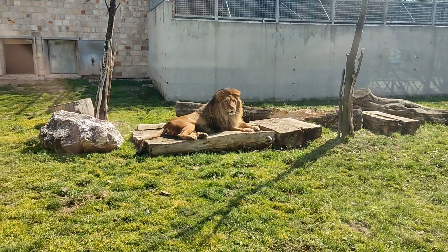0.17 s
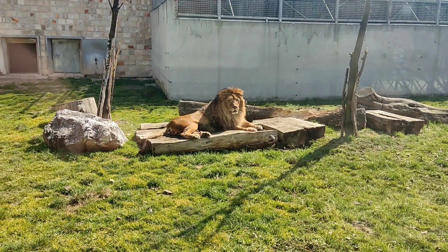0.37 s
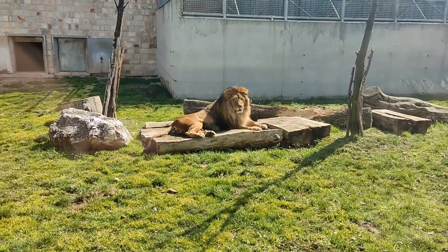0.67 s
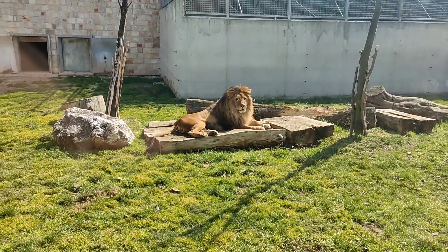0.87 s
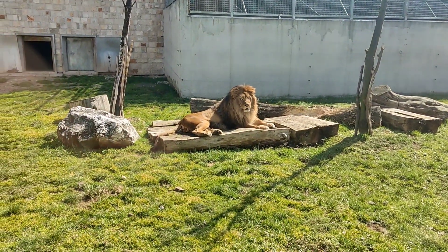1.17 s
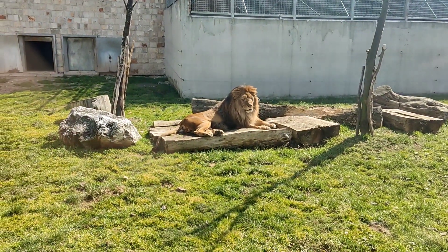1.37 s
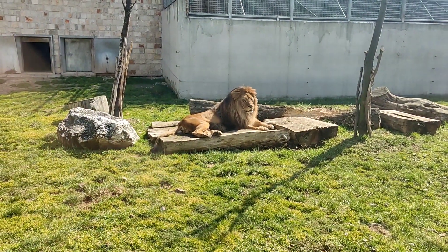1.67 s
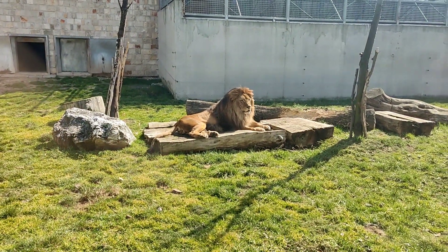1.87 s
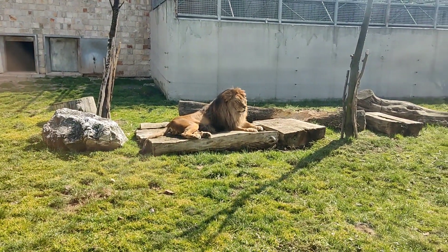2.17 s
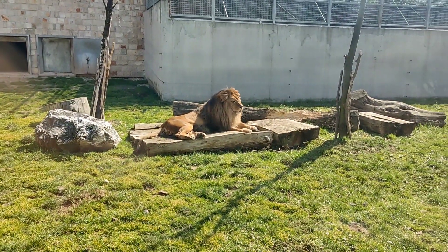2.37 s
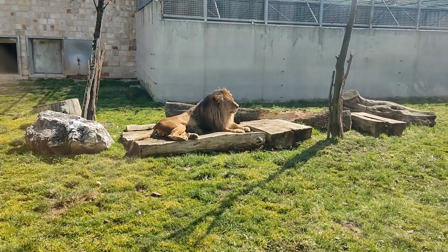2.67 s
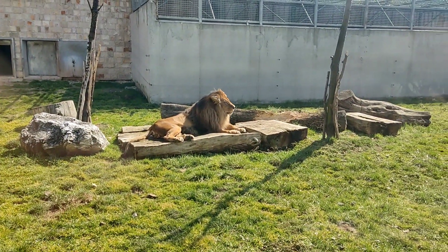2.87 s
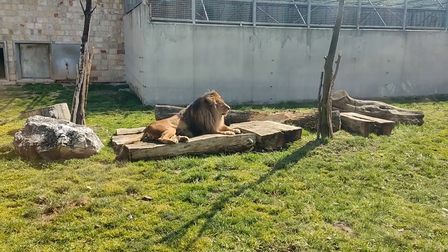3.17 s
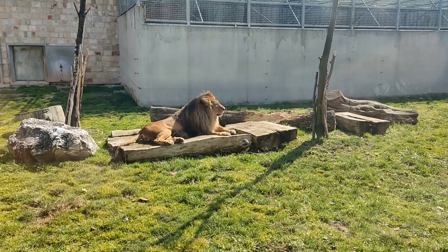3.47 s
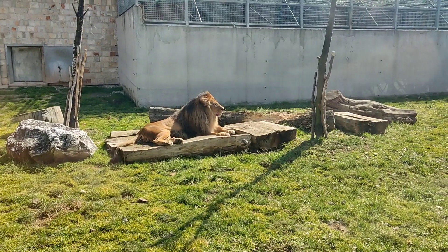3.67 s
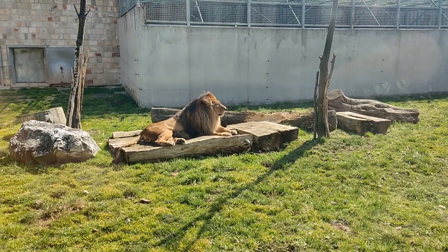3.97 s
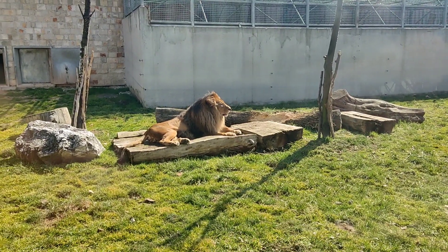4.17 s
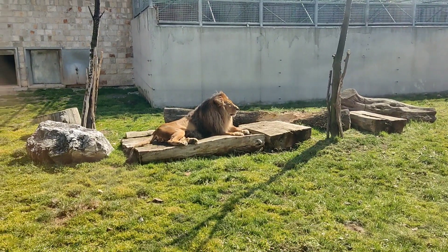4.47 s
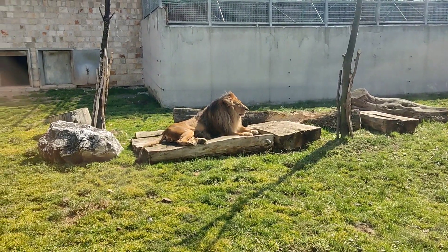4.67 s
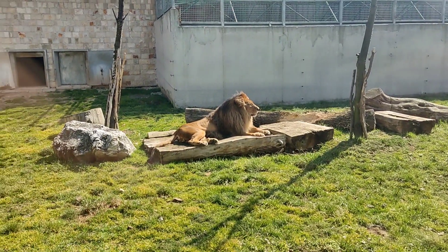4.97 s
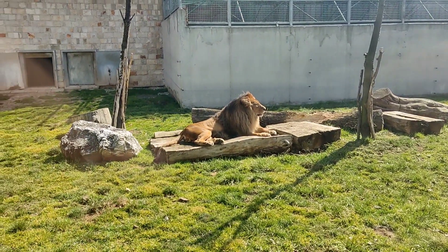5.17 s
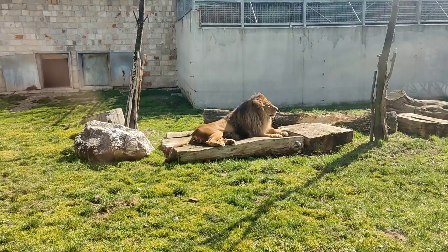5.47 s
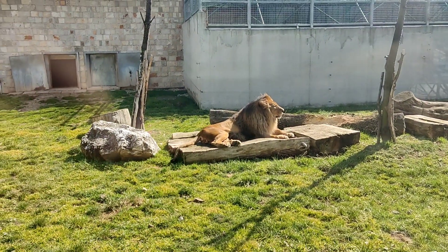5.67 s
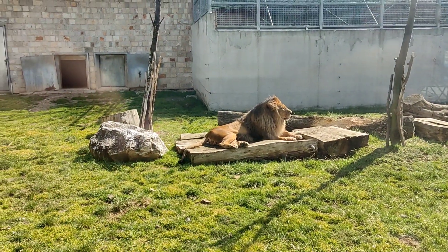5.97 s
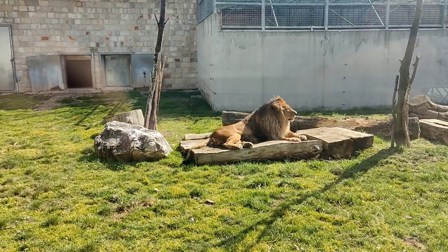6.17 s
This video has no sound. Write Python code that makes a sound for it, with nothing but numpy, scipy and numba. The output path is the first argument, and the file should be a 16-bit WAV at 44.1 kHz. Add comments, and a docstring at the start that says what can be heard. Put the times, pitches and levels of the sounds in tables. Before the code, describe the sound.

Steady soft outdoor hiss throughout, fading slightly. At 0 s a lion is already roaring, hoarse and low, far to the left. A tiny falling bird chirp comes at 0.19 s, then sharp dry clicks at 0.3 and 0.35. Further roars begin near 0.6, 1.37, 2.14, 2.95, 3.92, 4.9 and 5.78 s, each preceded by a short snorting gasp. Every roar leaps up in pitch, pushes hard, sags, then pushes again as the voice breaks into a fluttering rattle with loud throat flaps, lasting roughly a third of a second; the one at 3.92 is longer and more sustained. More clicks come at 1.33 and in a pair around 3.5. Faint wet snaps end gasps at 2.85, 3.75 and 5.62. A faint falling moan sounds at 5.2-5.45. Concrete walls return a dim ringing tail; the sound cuts off suddenly after the last roar.

```python
"""Lion roaring beside walls

A lion lying in a walled outdoor enclosure gives a run of short, hoarse roars, most after a snorting gasp.
Slack vocal folds and rushing noise drive resonances of his long throat, and flapping tissue chops the flow.
Noise bursts make clicks and wet snaps; a falling sine makes a chirp, and filtered pulses a faint moan.
Shaped noise makes a steady outdoor hiss, the walls ring on, and the lion sits far to the left."""
import sys
import numpy as np
from scipy import signal
from scipy.fft import rfft, irfft, next_fast_len
from scipy.io import wavfile
from scipy.ndimage import uniform_filter1d, minimum_filter1d
from numba import njit

SR = 44100
rng = np.random.default_rng(int(sys.argv[2]) if len(sys.argv) > 2 else 0)


def store_pcm(level_fs):
    """Save levels as 16-bit WAV."""
    pcm = np.round(np.clip(level_fs, -1, 1) * 32767).astype(np.int16)
    wavfile.write(sys.argv[1], SR, np.atleast_2d(pcm).T)


N = 279153
T = np.arange(N) / SR

# All levels in the tables are relative: the mix sets the final loudness.
# Outdoor background noise spectrum: pitch_hz, level_db
AIR_SPECTRUM = [(25, 1), (100, -10.5), (250, -13.5), (420, -0.5), (550, -0.5), (1100, -17), (1500, 0),
                (2000, 3.5), (2900, -4), (4000, 0), (5600, -15.5), (8000, -39), (14000, -30)]
# Colour of the sound that the walls send back: pitch_hz, level_db
WALL_COLOUR = [(400, 6), (700, -9), (1100, 11), (1500, -44), (7000, -28)]
# How much the right channel is turned down at each pitch: pitch_hz, cut_db
LEFT_LEAD = [(60, 8), (160, 10), (370, 14.5), (670, 18.5), (1230, 24), (2240, 19), (4110, 22.5),
             (7500, 5.5), (12000, 5)]
# Path of the faint moan: time_s, pitch_hz, level_db
MOAN = [(5.21, 306.5, -50), (5.24, 291, -35), (5.28, 283, -40), (5.32, 222, -54), (5.45, 186, -66)]
# Sharp clicks, mostly in pairs: start_s, level_db
CLICKS = [(0.303, -3.5), (0.35, -5), (0.357, -10), (1.333, -7), (3.459, -5), (3.507, -4.5), (3.512, -16)]
# Resonances of the clicking thing: pitch_hz, width_hz, level_db
CLICK_MODES = [(1586, 400, -0.5), (2000, 490, 1), (3630, 990, -11.5)]
# Crisp, wet snaps that can end a gasp: start_s, level_db
SNAPS = [(2.845, -20.5), (3.745, -24), (5.62, -20)]
# Gasps before roars: start_s, length_s, start_level_db, end_level_db, release_s, mouth_brightness_db
GASPS = [(0.427, 0.081, -17, -17, 0.073, -4), (1.16, 0.14, -18.5, -20, 0.075, -6.5),
         (1.964, 0.1, -22, -25, 0.1, -7), (2.781, 0.07, -20, -22.5, 0.047, -4.5),
         (3.633, 0.13, -21.5, -27.5, 0.087, -4.5), (4.743, 0.069, -19, -20.5, 0.086, -5),
         (5.567, 0.06, -23, -22, 0.17, -8.5)]
# Roars, each a voiced push, a sag and a rattling push: start_s, first_level_db, first_hold_s,
# chest_db, top_pitch_hz, top_after_s, sag_db, second_after_s, second_hold_s, second_level_db,
# extra_brightness_db, easing_s
ROARS = [(-0.14, -19, 0.05, -10, 185, 0.0082, -27, 0.16, 0.054, -20, 2.5, 0.0052),
         (0.593, -17, 0.048, -7.5, 188.9, 0.011, -27, 0.14, 0.053, -20, 1.5, 0.11),
         (1.365, -19, 0.064, -11, 187.9, 0.011, -25, 0.16, 0.044, -20.5, 3.5, 0.12),
         (2.14, -20, 0.066, -5, 199.6, 0.01, -26, 0.15, 0.061, -20, 2, 0.06),
         (2.954, -17, 0.073, -6.5, 187.1, 0.01, -26, 0.17, 0.041, -20, 3, 0.11),
         (3.918, -17.5, 0.049, -6, 211.1, 0.165, -23, 0.19, 0.2, -19, 3, 0.165),
         (4.897, -19.5, 0.023, -6, 195.1, 0.0095, -29, 0.12, 0.05, -22, 2.5, 0.017),
         (5.781, -20.5, 0.076, -2.5, 191.1, 0.022, -25, 0.18, 0.051, -20, 2, 0.11)]
# Single loud flaps of the throat: start_s, level_db
FLAPS = [(0.038, -0.5), (0.058, -7), (0.385, -12.5), (0.432, -16), (0.593, -4), (0.769, -11), (1.18, -3),
         (1.361, -7), (1.525, -9), (1.961, -12.5), (2.003, -12), (2.164, -4), (2.312, -5), (2.949, -10.5),
         (3.126, -11), (3.705, -12), (3.743, -4), (4.19, -10), (4.744, -10), (4.794, -9), (5.566, -11),
         (5.619, -5), (5.779, -10), (5.954, -9), (6.035, -18.5), (6.087, -15.5)]
# Resonances of chest and pharynx, throat, and open mouth, before the lion stretches them all:
# pitch_hz, width_hz, level_db
CHEST = [(336.4, 74, -8.5), (416.7, 46, 4.5)]
THROAT = [(630.7, 45, -8.5), (778.8, 104, -0.5), (937.5, 100, 1), (1194.5, 88, 1.5), (1352, 244, -3)]
MOUTH = [(1978, 413, 2.5), (2423, 640, -0.5), (3458, 1080, -7.5), (4337, 1030, -11), (4830, 163, -15)]

# Background: starting level, slow fade, and one brief dip
AIR_DB, AIR_FADE_DB_PER_S = -40, 0.7
AIR_DIP_DB, AIR_DIP_AT_S, AIR_DIP_S = -13, 2.91, 0.028
# A gasp jumps out of a soft intake of air
GASP_ATTACK_S, INTAKE_DB, INTAKE_S = 0.024, -10, 0.16
# The first push starts fast, holds and sags; the second swells and eases off
ROAR_ATTACK_S, SAG_DB_PER_S, SWELL_DB_PER_S, EASE_DB_PER_S = 0.042, 152, 167, 78
# The roar then stops quickly and leaves a weak, fading outflow
RELEASE_DB_PER_S, OUTFLOW_DB, OUTFLOW_DB_PER_S, QUIET_DB = 445, -33.5, 51, -54
# The voice starts to break this long before the second push eases off
BREAK_S = 0.042
# The chest booms as the pitch peaks, then settles; it is a little up in a gasp
CHEST_REST_DB, CHEST_GASP_DB, CHEST_SETTLE_S = -15.5, -12.5, 0.044
# The mouth sound brightens as the pitch rises, and again around the second push
MOUTH_REST_DB, MOUTH_DB_PER_HZ, MOUTH_WIDE_S = -4, 0.0377, 0.068
# The flow drops by this much while the throat is shut
SHUT_DB = -4.5
# The recorder cuts everything above this
TOP_HZ = 14300


def undb(db):
    """Turn decibels into gain."""
    return 10 ** (np.asarray(db) / 20)


def unit(x):
    """Scale to an average (rms) strength of 1."""
    return x / np.sqrt(np.mean(x ** 2))


def curves(table):
    """Join the rows of a table by straight lines, one curve for each column after the time."""
    s, *columns = np.transpose(table)
    return [np.interp(T, s, column) for column in columns]


def since(s):
    """Seconds gone by after a moment, 0 before it."""
    return np.maximum(T - s, 0)


def until(s):
    """Seconds left before a moment, 0 after it."""
    return np.maximum(s - T, 0)


def bump(at_s, width_s):
    """A smooth hump of height 1."""
    return np.exp(-((T - at_s) / width_s) ** 2)


def strokes(table, decay_s, hold_s):
    """An envelope that jumps up at each (start_s, level_db) row, holds and dies away."""
    out = np.zeros(N)
    shape = np.exp(-np.maximum(T[:SR // 10] - hold_s, 0) / decay_s)
    for s, db in table:
        i = int(s * SR)
        out[i:i + len(shape)] += undb(db) * shape[:N - i]
    return out


def noise():
    """White noise, equally strong at all pitches."""
    return rng.standard_normal(N)


def walk(rate):
    """A random drift with a spread near 1 that takes a new value `rate` times a second."""
    return 1.2 * np.interp(T * rate, np.arange(4096), rng.standard_normal(4096))


def steady(x, size=1500):
    """Even out the slow level and keep the fast grain; size is in samples."""
    power = np.abs(uniform_filter1d(x ** 2, size))
    return x / np.sqrt(power + 1e-12)


def colour(x, points, lag_s=0):
    """Shape by a (pitch_hz, level_db) spectrum and delay by lag_s."""
    n = next_fast_len(N + SR // 10)
    f = np.arange(n // 2 + 1) * SR / n
    hz, db = np.transpose(points)
    gain = undb(np.interp(np.log(f + 1), np.log(hz), db))
    delay = np.exp(-2j * np.pi * f * lag_s)
    return irfft(rfft(x, n) * gain * delay, n)[:N]


@njit
def svf(x, hz, width):
    """A band-pass filter (state-variable) whose centre pitch can move."""
    y, b, l = np.empty(len(x)), 0., 0.
    for i in range(len(x)):
        g, k = np.tan(np.pi * hz[i] / SR), width / hz[i]
        v = (b + g * (x[i] - l)) / (1 + g * (g + k))
        b, l, y[i] = 2 * v - b, l + 2 * g * v, k * v
    return y


def resonate(x, modes, stretch=1, wander=0, flicker_db=0):
    """Steep-sided resonances; stretch moves them all, and each may wander and swell on its own."""
    out = 0
    for hz, width, db in modes:
        centre = hz * stretch * (1 + wander * walk(24))
        level = undb(db + flicker_db * walk(30))
        once = svf(x, centre, 1. * width)
        out = out + level * svf(once, centre, 1. * width)
    return out


def cycles(hz, scatter_db):
    """One pulse of random size a cycle, and the place (0 to 1) within the cycle."""
    turns = np.cumsum(hz) / SR
    size = undb(scatter_db * rng.standard_normal(4096))[turns.astype(int)]
    wraps = np.diff(np.floor(turns), prepend=0)
    return unit(wraps * size), turns % 1


def echoes(x, t60_s, buildup_s):
    """Dense reflections, as fading noise: they build up, then fall at a rate of 60 dB per t60_s."""
    age = T[:SR]
    fade = undb(-60 * age / t60_s)
    tail = rng.standard_normal(SR) * fade * np.minimum(age / buildup_s, 1) ** 2
    return signal.fftconvolve(x, tail / np.linalg.norm(tail))[:N]


def air():
    """Outdoor background: shaped noise that slowly fades, wavers a little and dips once."""
    level_db = AIR_DB - AIR_FADE_DB_PER_S * T + AIR_DIP_DB * bump(AIR_DIP_AT_S, AIR_DIP_S)
    return unit(colour(noise(), AIR_SPECTRUM)) * undb(level_db + 0.14 * walk(2.96))


def hiss(roar, hiss_db=-55, ring_db=-27.0, spray_db=-37):
    """A high hiss that wavers slightly; the hardest blasts add a thin high ring and an airy spray."""
    band = colour(noise(), [(5900, -25), (6600, 0), (7150, 0), (7600, -30), (10200, -19), (14000, -32)])
    blast = np.abs(uniform_filter1d(roar ** 2, 900)) ** 0.59
    spray = undb(spray_db) * blast * unit(resonate(noise(), [(9800, 2000, 0)]))
    ring = undb(ring_db) * blast * unit(resonate(noise(), [(6810, 240, 0)]))
    return undb(hiss_db + walk(11.0)) * unit(band) + ring + spray


def walls(x):
    """The tail that comes back from the concrete walls as many blended reflections."""
    return colour(echoes(x, t60_s=1.26, buildup_s=0.052), WALL_COLOUR)


def moan():
    """A soft falling tone with few overtones, made by filtering one pulse a cycle."""
    pitch, level_db = curves(MOAN)
    folds, _ = cycles(pitch, scatter_db=2)
    tone = colour(folds, [(220, -7), (600, 8), (900, 14.0), (1200, 9), (4000, -50)])
    sounding = (T > MOAN[0][0]) * (T < MOAN[-1][0])
    return unit(tone) * undb(level_db) * sounding


def chirp(chirp_hz=4950, chirp_db=-38):
    """A small bird gives one short note: a pure tone that falls through chirp_hz."""
    age = (T - .185) / .008  # 0 at the loudest moment
    hz = chirp_hz * (1 - np.tanh(age) / 20)
    return undb(chirp_db) * np.exp(-age ** 2) * np.sin(2 * np.pi * np.cumsum(hz) / SR)


def clicks(soft_db=-18, soft_s=0.02):
    """Short, dry, bright clicks: noise bursts ring a few resonances, each with a softened onset."""
    soft = sum(undb(db + soft_db) * bump(s, soft_s) for s, db in CLICKS)
    burst = strokes(CLICKS, decay_s=0.0048, hold_s=0.0009)
    return undb(2.5) * resonate(noise() * (burst + soft), CLICK_MODES)


def snaps():
    """Very short cracks of noise, strongest in the midrange, around 1300 Hz."""
    crack = noise() * strokes(SNAPS, decay_s=0.0035, hold_s=0)
    return colour(crack, [(200, -43), (1300, 21), (4000, -1), (8000, -13)])


def second_push(row):
    """When a roar's second push is reached, when it eases off, and when the roar ends."""
    start, *_, after_s, held_s, _, _, easing_s = row
    swell = start + after_s
    ease = swell + held_s
    return swell, ease, ease + easing_s


def effort():
    """How hard the lion drives the air, in dB: gasp, pause, first push, sag, second push, outflow."""
    parts = [np.full(N, QUIET_DB)]
    for start, length_s, first_db, last_db, release_s, _ in GASPS:
        onset, end = start - GASP_ATTACK_S, start + length_s
        times = [onset - INTAKE_S, onset, start, end, end + release_s]
        levels = [QUIET_DB, first_db + INTAKE_DB, first_db, last_db, QUIET_DB]
        parts.append(np.interp(T, times, levels))
    for row in ROARS:
        start, first_db, held_s, _, _, _, sag_db, _, _, second_db, _, _ = row
        swell, ease, end = second_push(row)
        first = first_db - SAG_DB_PER_S * since(start + held_s)
        second = np.maximum(sag_db, second_db - SWELL_DB_PER_S * until(swell))
        second = second - EASE_DB_PER_S * since(ease) - RELEASE_DB_PER_S * since(end)
        outflow = OUTFLOW_DB - OUTFLOW_DB_PER_S * since(end)
        attack = (QUIET_DB - first_db) * until(start) / ROAR_ATTACK_S
        parts.append(np.max([first, second, outflow], axis=0) + attack)
    return np.max(parts, axis=0)  # the strongest part wins


def roar_shape(rest_hz=153, rise_s=.03, fall_s=.05, fade_s=0.021, climb_hz_per_s=130, waver=0.01):
    """Fold pitch, voicing on/off fade, and progress from 0 to 1 through each roar."""
    pitch, gate, progress = np.full(N, 1. * rest_hz), np.zeros(N), np.zeros(N)
    for row in ROARS:
        start, _, _, _, top_hz, high_s, *_ = row
        _, ease, _ = second_push(row)
        top, end = start + high_s, ease - BREAK_S
        # the pitch leaps up, climbs a little further and falls back to rest
        lift = top_hz - rest_hz - climb_hz_per_s * until(top)
        pitch += lift * np.exp(-(until(start) / rise_s) ** 2 - (since(top) / fall_s) ** 2)
        gate += np.interp(T, [start - fade_s, start, end, end + 2 * fade_s], [0, 1, 1, 0])
        progress += np.interp(T, [start - fade_s, start, end, end + 10 * fade_s], [0, 0, 1, 0])
    return pitch * (1 + waver * walk(28)), gate, progress


def throat_shape(pitch, glide_s=0.18):
    """Chest resonance and open-mouth brightness in dB, as they follow gasps and roars."""
    low_db = np.full(N, 1. * CHEST_REST_DB)
    bright_db = MOUTH_REST_DB + MOUTH_DB_PER_HZ * (pitch - pitch.min())
    for start, length_s, *_, mouth_db in GASPS:
        end = start + length_s
        gasping = np.interp(T, [start - 2 * glide_s, start, end, end + glide_s], [0, 1, 1, 0])
        low_db += (CHEST_GASP_DB - CHEST_REST_DB) * gasping
        bright_db += (mouth_db - MOUTH_REST_DB) * gasping
    for row in ROARS:
        start, _, _, chest_db, _, high_s, *_, wide_db, _ = row
        swell, ease, _ = second_push(row)
        boom = np.exp(-since(start + high_s) / CHEST_SETTLE_S - 2 * until(start) / ROAR_ATTACK_S)
        low_db += (chest_db - CHEST_REST_DB) * boom
        bright_db += wide_db * bump(ease, MOUTH_WIDE_S + (ease - swell) / 2)
    return low_db, bright_db


def lion(jitter=.016, voice_db=2, tiring_db=-9, flutter_hz=50, flutter_db=6, wander=0.042, sag=0.1,
         flicker_db=3.5, chest_db=0, throat_db=1.0, mouth_db=-1, husk_db=-10, hum_db=-51, flap_db=-10,
         flow_db=-2.5, shut_s=0.0093, overtones_db=-5):
    """Folds and breath excite the throat; the voice breaks up into a rattle as each roar runs out."""
    level_db = effort()
    pitch, gate, progress = roar_shape()
    low_db, bright_db = throat_shape(pitch)
    folds, phase = cycles(pitch * (1 + jitter * walk(170)), scatter_db=6)
    voicing = gate * undb(tiring_db * progress)
    # air rushes hardest while the folds are open
    rush = unit(noise() * (1 + gate * (1 - phase)))
    source = steady(rush) + undb(voice_db) * voicing * folds

    # the larynx is pulled down during a roar, so the lowest resonances sink
    chest = resonate(source, CHEST, 1.02 - sag * progress, wander / 2, flicker_db / 2)
    chest = undb(chest_db + low_db) * steady(chest)
    throat = resonate(source, THROAT, 0.98, wander, flicker_db)
    throat = undb(throat_db) * steady(throat, size=500)
    mouth = resonate(source, MOUTH, 0.9097, wander, flicker_db / 2)
    mouth = undb(mouth_db + bright_db) * steady(mouth, size=700)
    # turbulence fills the valleys between the resonances
    husk = colour(source, [(130, -94), (320, -0.5), (700, 1.0), (1600, 4.0),
                           (5000, -14), (8000, -18), (14000, -37)])
    husk = undb(husk_db) * steady(husk)

    # slack tissue chops the flow at an uneven rate, most when the voice is weak
    _, flap_phase = cycles(flutter_hz * np.exp(.4 * walk(40)), scatter_db=0)
    chop_db = flutter_db * (.5 - flap_phase) * (1.5 - 0.7 * voicing)
    rattle = undb(chop_db + 2 * walk(70))
    # before a loud flap the throat shuts for a moment, then the air bursts through
    shut = sum((T > s - shut_s) & (T < s) for s, _ in FLAPS)
    flow = undb(flow_db + level_db + SHUT_DB * shut) * rattle
    flow = flow + undb(flap_db) * strokes(FLAPS, decay_s=0.005, hold_s=0.0046)

    # the fundamental is weak, and carries better the higher it rises
    carry = (pitch / pitch.min()) ** 2
    fundamental = undb(hum_db + 3.8 * walk(45)) * carry * gate * np.sin(2 * np.pi * phase)
    # the low overtones stay clean while the folds swing freely
    overtones = sum(np.sin(2 * np.pi * k * phase + k * k) * 2 / k for k in range(2, 7))
    tone = undb(overtones_db + level_db + low_db / 2) * voicing * overtones
    return uniform_filter1d(flow, 90) * (chest + throat + mouth + husk) + fundamental + tone


def scene(wet_db=-19, lag_s=0.000391, scatter_db=-7, diffuse_db=5):
    """The right channel hears the lion later and much more weakly, mixed with nearby reflections."""
    roar = lion() + snaps()
    direct = roar + clicks() + moan() + chirp()
    left = direct + undb(wet_db) * walls(direct) + air()
    nearby = colour(echoes(direct, t60_s=0.15, buildup_s=0.004), [(400, -1), (1200, 1.5), (4000, 9)])
    nearby = undb(scatter_db) * nearby
    # fresh random wall sound and air keep the two channels apart
    diffuse = undb(diffuse_db) * (undb(wet_db) * walls(direct) + air())
    right = colour(direct + nearby + diffuse, [(hz, -db) for hz, db in LEFT_LEAD], lag_s)
    return undb(5.5) * np.array([left, right]) + np.array([hiss(roar), hiss(roar)])


def record(dry):
    """The microphone rolls off the highest treble; a limiter holds the peaks; the recorder cuts the top."""
    soft = signal.sosfilt(signal.butter(4, 11500, fs=SR, output="sos"), dry)
    headroom = .88 / np.maximum(np.abs(soft).max(axis=0), .88)
    # one smoothed gain for both channels
    gain = uniform_filter1d(minimum_filter1d(headroom, size=301), size=301)
    top_cut = signal.ellip(10, .2, 80, TOP_HZ, fs=SR, output="sos")
    return signal.sosfilt(top_cut, soft * gain)


dry = scene()
out = record(dry)
store_pcm(out)
```